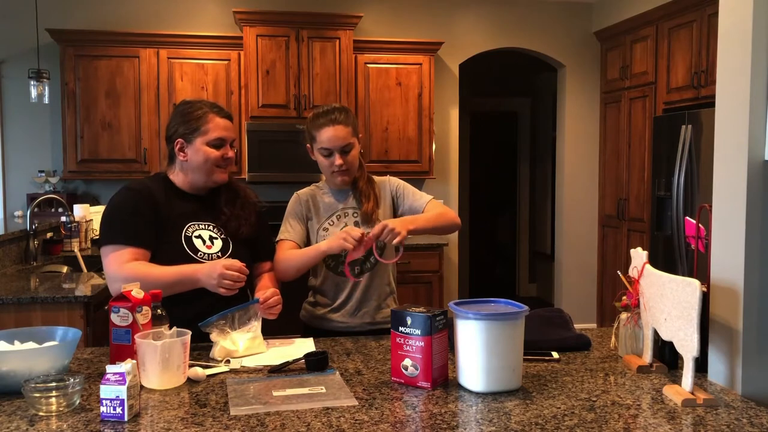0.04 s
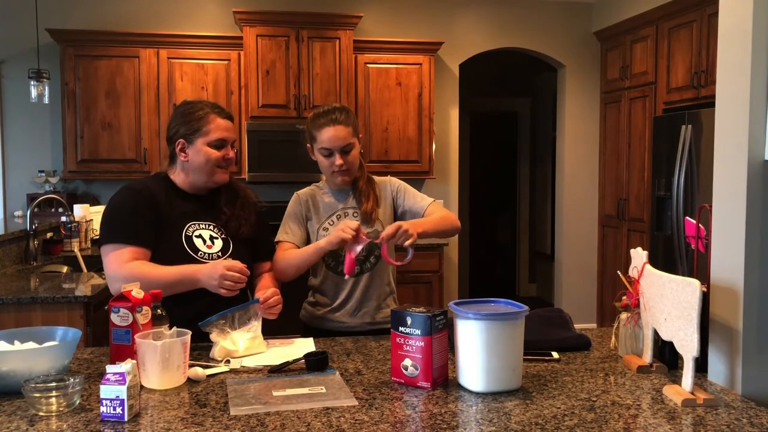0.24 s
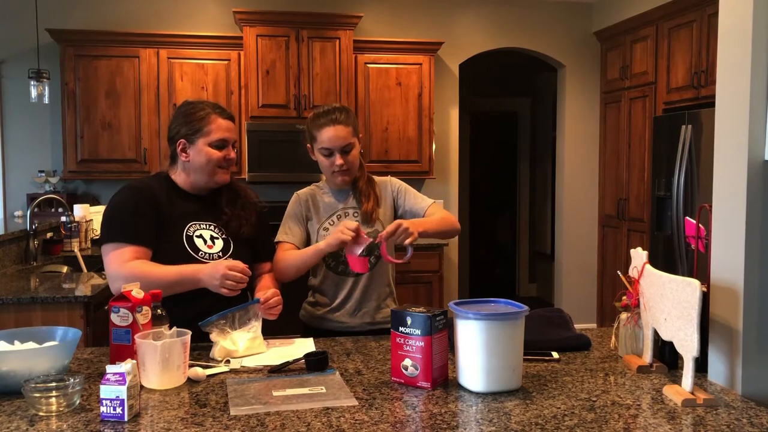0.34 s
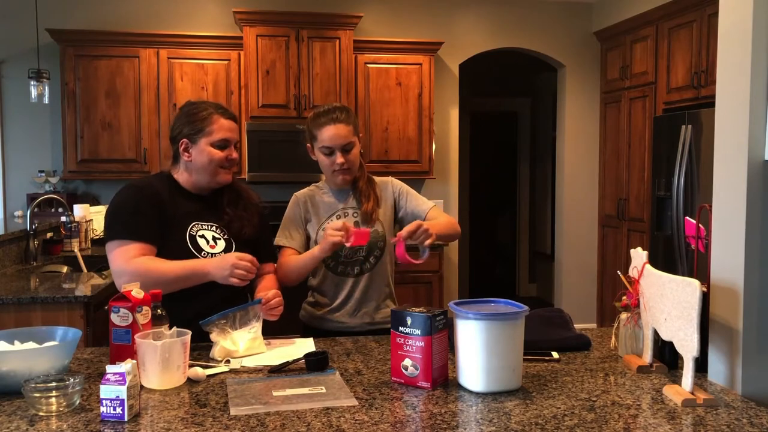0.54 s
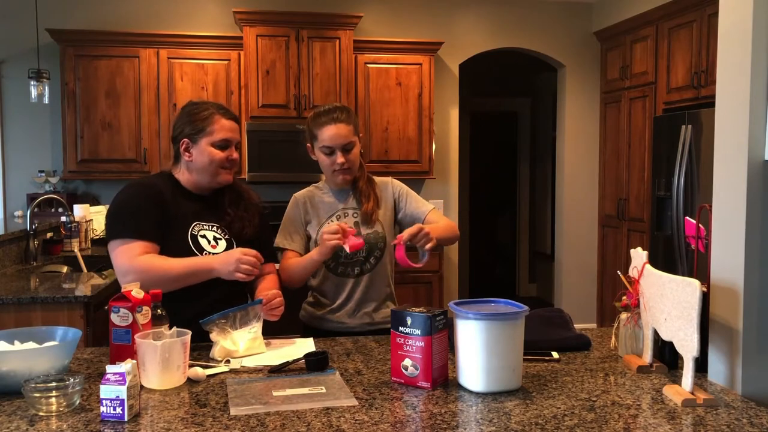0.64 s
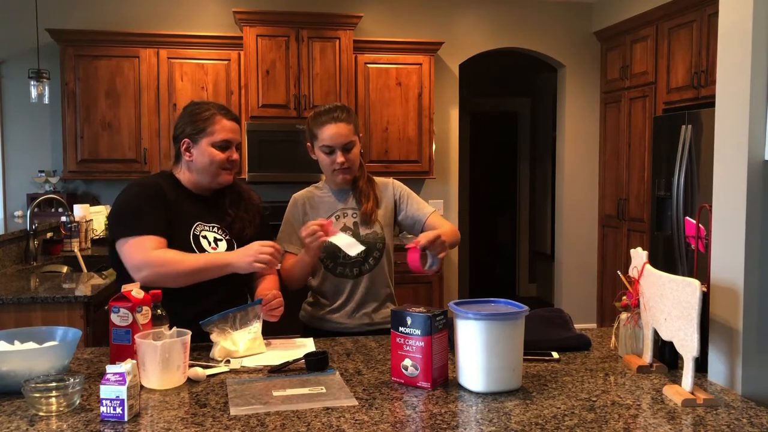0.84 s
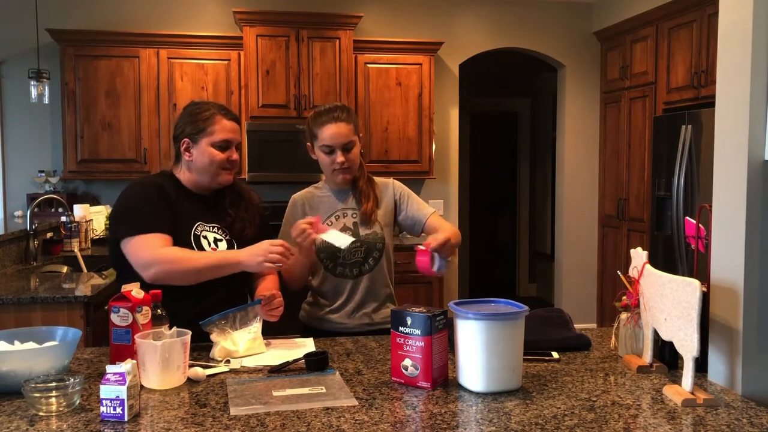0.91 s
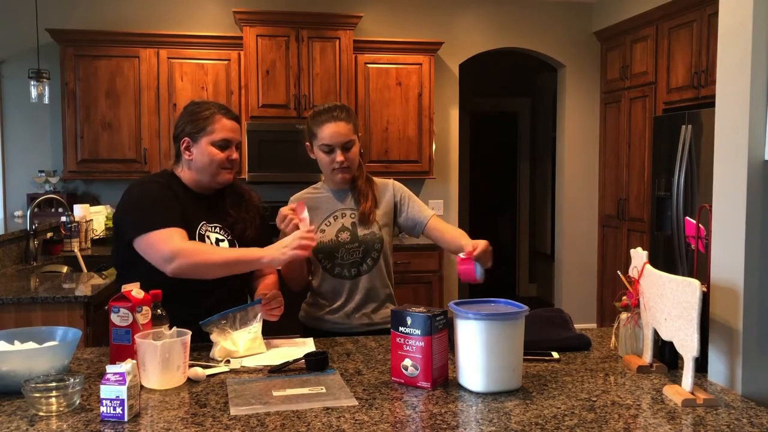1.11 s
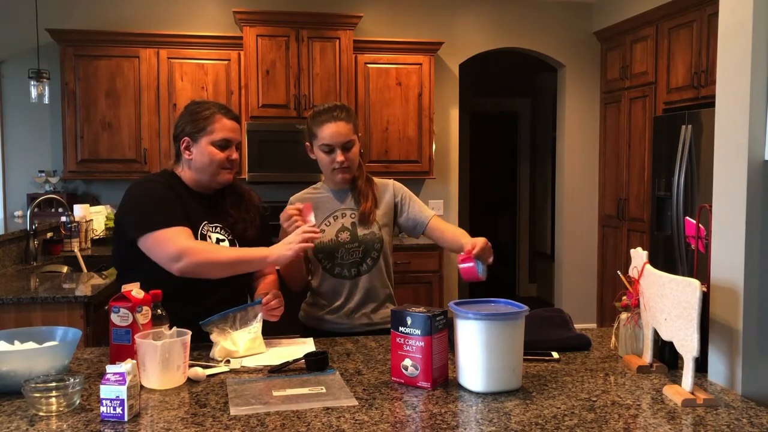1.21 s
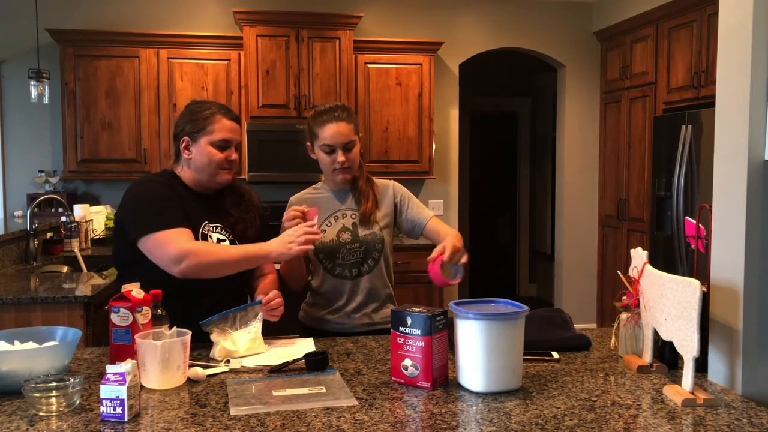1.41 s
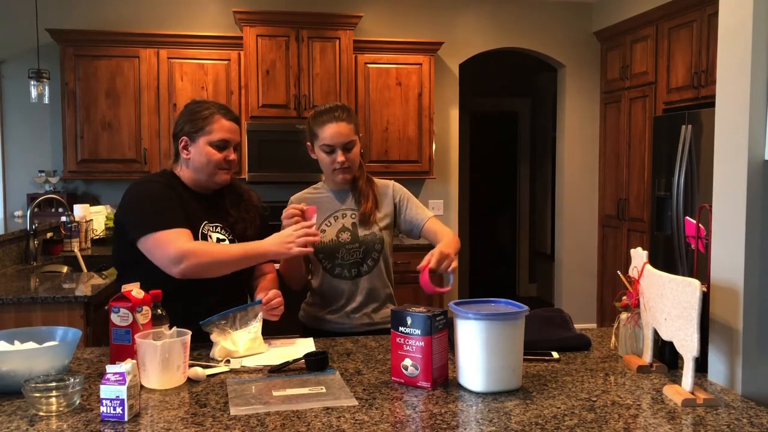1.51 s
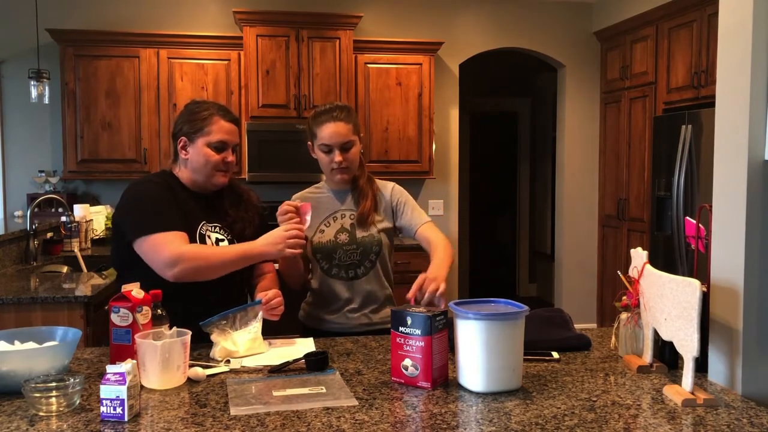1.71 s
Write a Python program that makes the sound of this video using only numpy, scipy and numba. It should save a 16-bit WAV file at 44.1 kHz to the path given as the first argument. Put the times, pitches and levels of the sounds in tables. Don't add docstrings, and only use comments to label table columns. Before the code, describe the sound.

Cloth tape is torn off a roll in a quick, jerky, bright rip, with soft hand thuds, then faint sticky crackling and a single sharp snap, in a hard-walled kitchen, a few metres from the microphone.

```python
import sys
import numpy as np
from scipy import signal
from scipy.fft import rfft, irfft
from scipy.io import wavfile
from scipy.ndimage import uniform_filter1d
from numba import njit

SR = 44100
rng = np.random.default_rng(int(sys.argv[2]) if len(sys.argv) > 2 else 0)


def unload_wav(signal):
    wavfile.write(
        sys.argv[1],
        SR,
        np.round(np.clip(np.atleast_2d(signal).T, -1, 1) * 32767).astype(np.int16),
    )


def decibels_to_gain(level_db):
    exponent = np.asarray(level_db, float) / 20
    return 10 ** exponent


N = 77175


def unit(x):
    return x / np.sqrt(np.mean(x ** 2))


def colour(x, points):
    f, p = np.fft.rfftfreq(len(x), 1 / SR), np.array(points)
    gain_db = np.interp(np.log(f + 1), np.log(p[:, 0]), p[:, 1])
    return irfft(rfft(x) * decibels_to_gain(gain_db), len(x))


@njit
def svf(x, hz, width):
    y, b, l = np.empty(len(x)), 0., 0.
    for i in range(len(x)):
        g, k = np.tan(np.pi * hz[i] / SR), width[i] / hz[i]
        v = (b + g * (x[i] - l)) / (1 + g * (g + k))
        b, l, y[i] = 2 * v - b, l + 2 * g * v, k * v
    return y


def band(x, hz, width_hz):
    return svf(x, np.full(len(x), min(hz, .4 * SR)), np.full(len(x), max(width_hz, 10.)))


def steep_band(x, hz, width_hz):
    return band(band(x, hz, width_hz), hz, width_hz)


def walk(rate):
    k = int(SR / rate)
    held = np.repeat(rng.standard_normal(N // k + 1), k)
    return unit(uniform_filter1d(uniform_filter1d(held, k), k)[:N])


def puff(start, length, rise):
    u = np.maximum(np.arange(N) / SR - start, 0)
    return (1 - np.exp(-u / rise)) * np.exp(-u / max(length, 1e-4))


def room_tone():
    # [f/Hz, density/dB]
    hush = [(25, -34), (42, -7.5), (361, -6.5), (440, -14.5), (474, -7.5), (564, -12.5), (1520, -21),
            (15500, -36)]
    # [f/Hz, level/dB rms]
    hum_lines = [(59.2, -74.5), (118.4, -82), (236.9, -80), (355.3, -80), (414.5, -79.5), (473.7, -76)]
    # [t/s, level/dB]
    swell = [(0.3, -8.5), (1.0, 0.5)]
    t = np.arange(N) / SR
    out = unit(colour(rng.standard_normal(N), hush)) * decibels_to_gain(-67.4 + .8 * walk(5))
    for hz, db in hum_lines:
        level_db = db + 1.4 * walk(6.8)
        if hz == hum_lines[-1][0]:
            level_db = level_db + np.interp(t, *np.array(swell).T)
        out += np.sqrt(2) * decibels_to_gain(level_db) * np.sin(2 * np.pi * (hz * t + rng.random()))
    return out


def squeaks():
    # [start t/s, end t/s, level/dB, f/Hz]
    folds = [
        (0.01, 0.241, -77, 1527),
        (0.655, 0.86, -69, 1460),
    ]
    t, out = np.arange(N) / SR, np.zeros(N)
    for start, end, db, hz in folds:
        fade = np.clip(np.minimum(t - start, end - t) / 0.011, 0, 1)
        out += decibels_to_gain(db) * fade * unit(steep_band(rng.standard_normal(N), hz, 100))
    return out


def tear():
    # [t/s, peak level/dB, length/s, taut strip f/Hz]
    jerks = [(.1992, -34, .0006, 2600), (.2001, -32, .0008, 2500), (.2048, -32, .001, 2500),
             (.2112, -15.5, .0015, 2550), (.2146, -17, .001, 2550), (.2175, -16.5, .001, 2500),
             (.2202, -23, .0008, 2700), (.2238, -19, .001, 2900), (.2265, -19, .0012, 3500),
             (.2314, -14, .0012, 3800), (.2333, -17, .001, 4000), (.2348, -18, .0012, 3600),
             (.2388, -16, .001, 3600), (.2406, -19, .001, 4000), (.2437, -12, .0012, 3900),
             (.246, -12, .001, 3900), (.2486, -11, .001, 3800), (.2501, -13, .0012, 4200),
             (.2607, -16, .001, 3000), (.2617, -12, .001, 3200), (.2628, -14, .001, 3800),
             (.2702, -13, .0008, 3900), (.2739, -13, .0012, 3300), (.2756, -15, .001, 3600)]
    # [f/Hz, gain/dB]
    cloth = [(150, -19.5), (500, -4), (900, -12.5), (1500, -6.5), (2200, 0.5), (5500, -0.5), (10000, -1),
             (16800, 0)]
    # [f/Hz, width/Hz, level/dB]
    sheet = [(5800, 8200, 0.5), (8900, 610, 0.5), (11300, 1200, -8.5), (14900, 770, -21)]
    strip_width, strip_db = 0.38, 2.5
    out, u = np.zeros(N), np.arange(600) / SR
    for s, db, length, hz in jerks:
        threads = rng.standard_normal(600) * decibels_to_gain(rng.exponential(size=600))
        spray = threads * (1 - np.exp(-u / 0.00008)) * np.exp(-(u / (2 * length)) ** 2)
        strip = steep_band(spray, hz, hz * strip_width)
        rung = spray + decibels_to_gain(strip_db) * 2 * strip
        rung = rung + sum(decibels_to_gain(g) * band(spray, f, w) for f, w, g in sheet)
        out[int(s * SR):][:600] += rung * decibels_to_gain(db) / np.sqrt(np.sum(rung ** 2) / (length * SR)) / 2
    return colour(out, cloth) * decibels_to_gain(0.5)


def cracks(rows):
    fray_db, fray_s, air_db, gain_db = -9, .0015, -4.5, 1.5
    out, u = np.zeros(N + 800), np.arange(800) / SR
    for s, db, hz, width_hz in rows:
        fray = rng.standard_normal(800) * np.exp(-u / fray_s) / 2
        crack = (u == 0) + decibels_to_gain(fray_db) * fray
        ring = steep_band(crack, hz, width_hz)
        ring = ring / np.abs(ring).max() + decibels_to_gain(air_db) * band(crack, 5400, 8400)
        out[int(s * SR):][:800] += ring * decibels_to_gain(db + gain_db)
    return out[:N]


def snaps():
    # [t/s, peak level/dB, f/Hz, width/Hz]
    loose_ends = [(.1995, -23, 13900, 7000), (.2004, -31, 7960, 3960), (.2052, -39, 7970, 5900),
                  (1.226, -63, 6630, 7000), (1.2992, -55.5, 2170, 1310), (1.2984, -54, 7000, 9000),
                  (1.3082, -57, 2400, 1400), (1.3102, -58, 2300, 1400), (1.3125, -61, 8000, 9000),
                  (1.316, -64, 13500, 6000), (1.3672, -61, 9100, 3520), (1.718, -70, 10530, 2004),
                  (1.7252, -53.5, 10260, 3005), (1.7254, -64, 14330, 4100), (1.7385, -63.5, 4640, 1490),
                  (1.739, -62, 7500, 2500)]
    return cracks(loose_ends)


def thuds():
    # [t/s, level/dB, f/Hz, t60/s]
    knocks = [
        (0.214, -43.5, 620, 0.045),
        (0.26, -42, 520, 0.05),
        (0.256, -37, 500, 0.06),
        (0.282, -34, 340, 0.09),
        (0.272, -45, 250, 0.06),
        (0.35, -49, 303, 0.13),
        (0.44, -48.5, 597, 0.076),
        (0.47, -60, 270, 0.06),
        (0.49, -57.5, 970, 0.046),
    ]
    t, out = np.arange(N) / SR, np.zeros(N)
    for s, db, hz, t60 in knocks:
        hollow = np.sqrt(2) * np.sin(2 * np.pi * hz * (t - s))
        rough = .6 * unit(steep_band(rng.standard_normal(N), hz, hz / 3))
        out += decibels_to_gain(db - 3) * puff(s, t60 / np.log(1000), 0.005) * (hollow + rough)
    return out


def peel():
    # [t/s, level/dB, free flap f/Hz, flap share/dB]
    course = [
        (.42, -55, 8050, -30),
        (.62, -71, 7950, -33),
        (0.755, -62.5, 7300, -9),
        (.805, -59, 8200, -1),
        (.85, -60, 7600, -3),
        (0.9, -59, 7300, -4.5),
        (0.945, -61, 5660, -6),
        (0.998, -68.5, 5550, 2),
        (1.015, -67, 5300, -5.5),
    ]
    # [t/s, strength/dB, length/s]
    rattle_rows = [(.762, -4, .003), (.769, 2, .004), (.788, 0, .002), (.792, 2, .003), (.796, 1, .008),
                   (.81, 1, .008), (.823, -5, .006), (.833, 1, .008), (.847, 1, .007), (.857, 1, .003),
                   (.861, 0, .003), (.871, 1, .008), (.888, 2, .006), (.895, 1, .003), (.9, -2, .003),
                   (.9085, 4, .005), (.926, 3, .007), (.938, 0, .005), (.943, 2, .006), (.956, -2, .007),
                   (.972, -2, .007), (.987, 5, .006), (.994, 2, .005)]
    clicks_per_s, spread_db, flap_width = 7000, 2.2, .34
    rattle_from_s, lull_db = .755, -11
    air_follows = 0.49
    t, p = np.arange(N) / SR, np.array(course)

    struck = rng.random(N) < clicks_per_s / SR
    strength = decibels_to_gain(spread_db * np.minimum(rng.exponential(size=N), 3))
    clicks = struck * strength * rng.standard_normal(N)
    clicks = signal.lfilter([1], [1, -.5], clicks + 0.23 * rng.standard_normal(N))

    early = decibels_to_gain(4.5 * np.minimum(walk(110), 1.5))
    rattles = decibels_to_gain(lull_db)
    for s, db, length in rattle_rows:
        rattles = rattles + decibels_to_gain(db) * (t > s) * np.exp(-((t - s) / length) ** 4)
    jerky = clicks * np.where(t < rattle_from_s, early, rattles)
    hiss = clicks * np.where(t < rattle_from_s, early, rattles ** air_follows)

    hz = np.interp(t, p[:, 0], p[:, 2])
    flap = svf(svf(jerky, hz, hz * flap_width), hz, hz * flap_width)
    body = 2.0 * band(hiss, 2450, 1030) + 3.7 * band(hiss, 577, 250) + 3.0 * band(hiss, 4420, 1370)
    air = band(hiss, 11700, 9300) + decibels_to_gain(-1.5) * band(hiss, 9330, 1600) + decibels_to_gain(-9.5) * body
    flap_gain = decibels_to_gain(np.interp(t, p[:, 0], p[:, 3]))
    level = decibels_to_gain(np.interp(t, p[:, 0], p[:, 1], -140, -140))
    return (unit(flap) * flap_gain + decibels_to_gain(-2.5) * unit(air)) * level


def ticks():
    # [t/s, peak level/dB, f/Hz, width/Hz]
    tacky_spots = [(.448, -46, 13500, 6000), (.455, -51, 13000, 6300), (.4687, -44, 14100, 6170),
                   (.492, -47, 11200, 3050), (.5, -49, 12200, 5700), (.5355, -50, 13500, 5030),
                   (.54, -52, 12000, 6000), (.574, -53, 11330, 6140), (.6064, -46.5, 12400, 7000),
                   (.611, -54, 13000, 6000), (.6523, -45, 8700, 7000), (.6842, -74, 11000, 6100),
                   (.7201, -55, 10100, 7000), (.769, -49, 7150, 2540), (.7925, -52, 8800, 3020),
                   (.7955, -49, 8900, 3000), (.8115, -51, 8900, 2500), (.835, -56, 10700, 2510),
                   (.858, -48, 8900, 4000), (.875, -46, 9900, 5000), (.8625, -48, 7250, 2500),
                   (.9093, -41.5, 7900, 5050), (.9145, -45, 8900, 6000), (.9262, -41.5, 6900, 4000),
                   (.912, -50, 13000, 3500), (.928, -44, 11900, 4000), (.946, -53, 13000, 5000),
                   (.9105, -52, 2400, 1510), (.997, -44, 6200, 6200)]
    return cracks(tacky_spots)


def pop():
    # [f/Hz, gain/dB]
    rings = [(900, -29.5), (1900, -13), (3200, -10.5), (5400, -3), (7000, -9.5), (9200, -5), (12000, -10),
             (16500, -14)]
    click = 1. * (np.arange(N) == int(1.3703 * SR))
    for lag in (3, 5, 8):
        gap = np.zeros(lag - 1)
        click = signal.lfilter(np.r_[-.5, gap, 1], np.r_[1, gap, -.5], click)
    return decibels_to_gain(-7.5) * colour(click, rings)


def kitchen(x):
    # [f/Hz, t60/s, level/dB]
    room = [(201.6, 1.4, -8.5), (498, 0.67, -6.5), (1200, 1.275, 6), (2300, 0.94, -7), (3800, 0.82, -5.5),
            (5340, 1.05, -2), (7000, 0.56, -6), (13000, .55, -11)]
    # [t/s, level/dB]
    echoes = [(.001, -17), (.0017, -14), (.0023, -17), (.003, -17), (.0039, -16), (.0122, -21),
              (.0136, -15), (.0165, -20), (.031, -23), (.0535, -23), (.0595, -23)]
    build_s, smear_s, echo_hz = 0.0052, .0005, 14000
    u, r = np.arange(N) / SR, np.array(room)
    tail = np.zeros(N)
    for hz in 108 * 2 ** np.arange(0, 7.4, 1 / 3):
        t60 = np.interp(np.log(hz), np.log(r[:, 0]), r[:, 1])
        db = np.interp(np.log(hz), np.log(r[:, 0]), r[:, 2])
        noise = steep_band(rng.standard_normal(N), hz, hz / 2.5)
        tail += decibels_to_gain(db) * noise * np.exp(-u * np.log(1000) / t60) * np.sqrt(28 / t60 / SR)
    tail *= 1 - np.exp(-(u / build_s) ** 2)
    tail[0] += 1
    for s, db in echoes:
        smear = band(rng.standard_normal(200) * np.exp(-u[:200] / smear_s), echo_hz / 2, echo_hz)
        tail[int(s * SR):][:200] += decibels_to_gain(db) * smear / np.sqrt(np.sum(smear ** 2))
    return signal.fftconvolve(x, tail)[:N]


def scene():
    crack = pop()
    near = tear() + snaps() + thuds() + peel() + ticks() + crack
    flap_ring = colour(crack, [(3600, -40), (4400, 0), (6200, 0), (7200, -40)])
    shaded = 0.33 * (crack - flap_ring)
    return (kitchen(near) - shaded + squeaks() + room_tone())[None]


def low_pass(x, hz):
    return signal.sosfiltfilt(signal.ellip(6, .1, 40, hz, fs=SR, output="sos"), x)


def top_cut(x):
    return signal.sosfilt(signal.butter(12, 16990, fs=SR, output="sos"), x)


def record(dry):
    steady, wide = low_pass(dry, 15750), low_pass(dry, 16600)
    sudden_db = 12
    fast = uniform_filter1d(np.diff(steady, prepend=0) ** 2, size=128)
    before = np.roll(uniform_filter1d(fast, size=700), 420, axis=1)
    jumps = 1. * (fast > before * decibels_to_gain(2 * sudden_db))
    sudden = np.clip(uniform_filter1d(jumps, size=500) * 40, 0, 1)
    mix = steady + sudden * (wide - steady)
    return top_cut(mix)


dry = scene()
out = record(dry)
unload_wav(out)
```